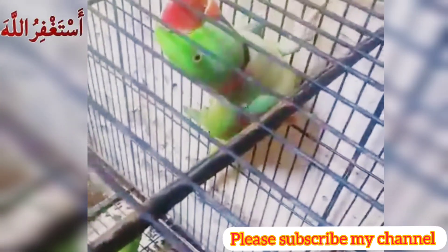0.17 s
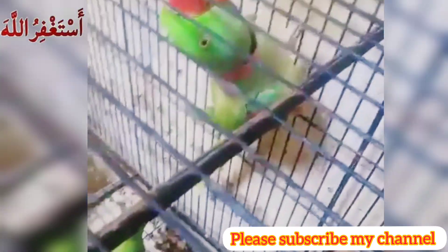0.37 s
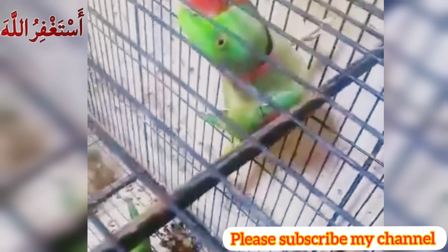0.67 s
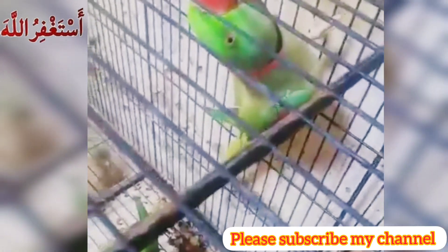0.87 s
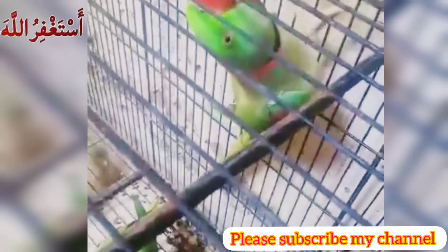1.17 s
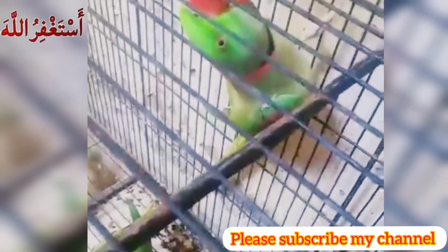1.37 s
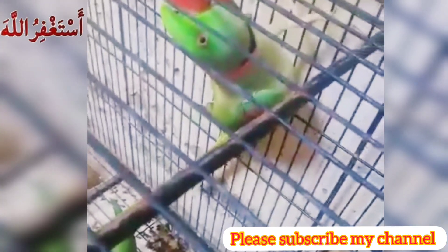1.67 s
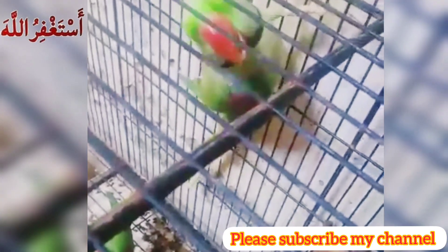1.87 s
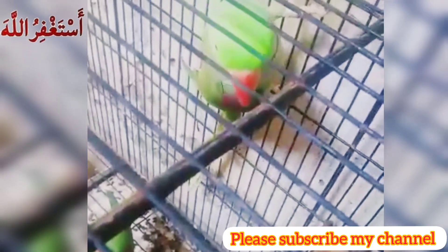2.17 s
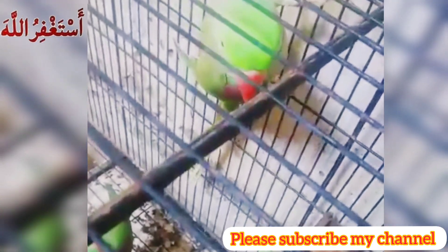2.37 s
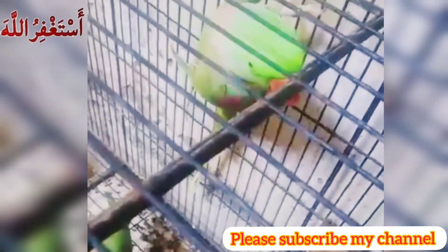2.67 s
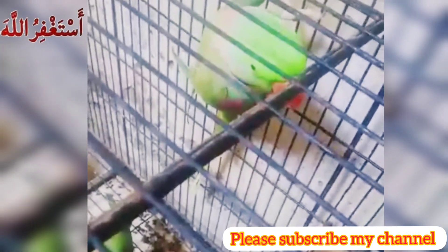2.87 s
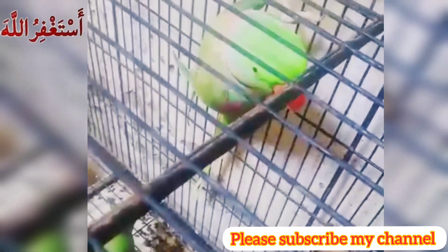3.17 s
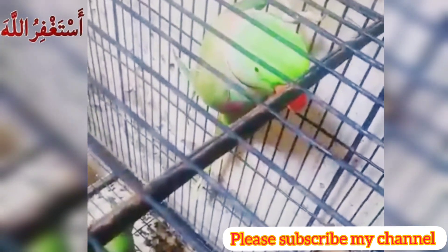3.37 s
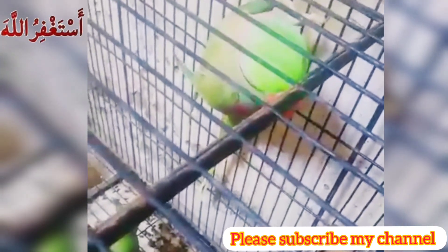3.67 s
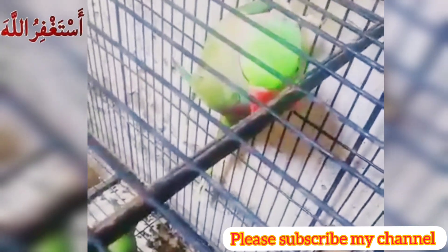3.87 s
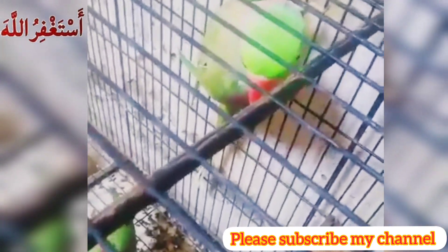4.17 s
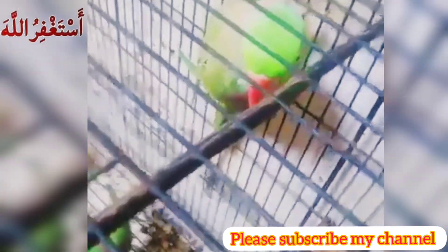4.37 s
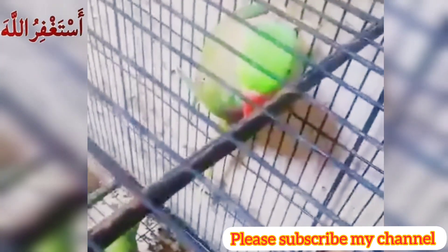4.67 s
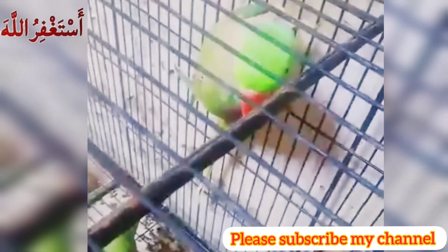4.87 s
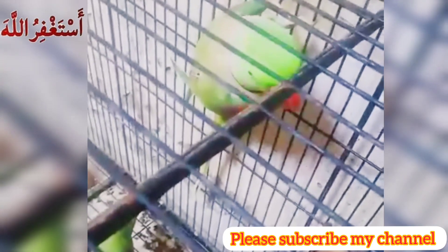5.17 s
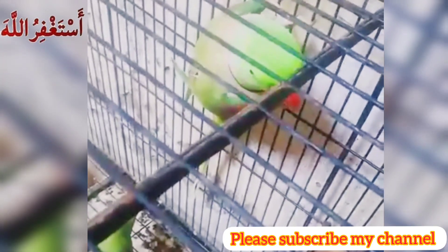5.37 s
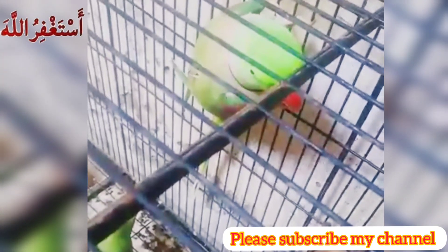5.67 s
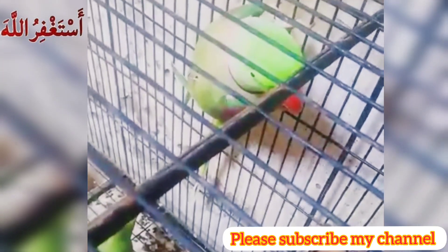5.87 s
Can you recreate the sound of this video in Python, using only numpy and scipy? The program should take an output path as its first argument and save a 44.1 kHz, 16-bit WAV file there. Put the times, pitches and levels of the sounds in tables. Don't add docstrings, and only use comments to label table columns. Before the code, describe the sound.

A caged parakeet very close to a phone microphone in a hard, echoing room. Feathers rustle and far small birds chirp hoarsely; a distant fowl caws twice, overlapped by one falling whistle. A cut-off yap and a loud buzzy squawk follow, then quiet. Later come three quick arched whistles with a strong wing brush, and a second yap and squawk. Low machine hum and faint hiss continue beneath.

```python
import sys
import numpy as np
from scipy import signal
from scipy.fft import rfft, irfft, next_fast_len
from scipy.io import wavfile
from scipy.ndimage import uniform_filter1d, minimum_filter1d, map_coordinates

SR = 44100
rng = np.random.default_rng(int(sys.argv[2]) if len(sys.argv) > 2 else 0)


def invert_db(level):
    return 10 ** (np.asarray(level, dtype=float) / 20)


def to_wav(sig):
    pcm = np.clip(np.atleast_2d(sig), -1, 1) * 32767
    pcm = np.round(pcm).astype(np.int16)
    wavfile.write(sys.argv[1], SR, pcm.T)


N = 265878
T = np.arange(N) / SR
TOP_HZ = 13500


def unit(x):
    return x / np.sqrt(np.mean(x ** 2) + 1e-20)


def along(points, hz):
    f, v = np.transpose(points)
    return np.interp(np.log(hz + 1), np.log(f + 1), v)


def step(x, width):
    return 0.5 + 0.5 * np.tanh(x / (2 * width))


def wobble(rate, size=N):
    knots = rng.standard_normal(int(size * rate / SR) + 4)
    return map_coordinates(knots, [np.arange(size) * rate / SR])


def phase_of(hz):
    return 2 * np.pi * np.cumsum(hz) / SR


def filtered(x, response):
    m = next_fast_len(x.shape[-1] + 8192)
    return irfft(rfft(x, m) * response(np.fft.rfftfreq(m, 1 / SR)), m)[..., :x.shape[-1]]


def resonances(modes):
    def response(f):
        total = 0
        for k, (centre, width, db) in enumerate(modes):
            damping = 1j * f * width
            total = total + (-1) ** k * invert_db(db) * damping / (centre * centre - f * f + damping)
        return total
    return response


def held(start, length, edge):
    span = slice(round(start * SR), round((start + length) * SR))
    t = T[span] - start
    return span, t, np.clip(np.minimum(t, length - t) / edge, 0, 1)


def note(rows, smooth, edge):
    s, *cols = np.transpose(rows)
    span, t, gate = held(s[0], s[-1] - s[0], edge)
    curves = [uniform_filter1d(np.interp(T[span], s, c), int(smooth * SR), mode="nearest") for c in cols]
    return span, gate, curves


def add_at(out, start, sound):
    out[:, round(start * SR):][:, :sound.shape[-1]] += sound


def buzz(hz, rough, jitter, breath):
    size = len(hz)
    phase = phase_of(hz * (1 + jitter * rough * wobble(500, size)))
    k = np.arange(1, 40)[:, None]
    pulses = unit((np.cos(k * phase) * (k * hz < TOP_HZ)).sum(0))
    gated = unit(rng.standard_normal(size) * (1 + np.cos(phase)))
    return pulses * invert_db(3.66 * rough * wobble(400, size)) + breath * rough * gated


# (f/Hz, t60/s)
ROOM_DECAY = [(400, 1.2), (1500, 0.89), (3000, 0.78), (6000, 0.62), (12000, 0.36)]


def room(x, delay):
    hz, t, z = signal.stft(rng.standard_normal((2, SR)), SR, nperseg=256)
    decay = invert_db(-60 * t / along(ROOM_DECAY, hz)[:, None])
    tail = signal.istft(z * decay, SR, nperseg=256)[1]
    tail = tail * (1 - np.exp(-np.arange(tail.shape[1]) / SR / delay))
    return signal.fftconvolve(x[None], tail / np.linalg.norm(tail[0]), axes=1)[:, :N]


def stereo_noise(spectrum, alike):
    def mid_side(hz):
        turn = np.arccos(np.clip(along(alike, hz), -1, 1)) / 2
        return invert_db(along(spectrum, hz)) * [np.cos(turn), np.sin(turn)]
    mid, side = filtered(rng.standard_normal((2, N)), mid_side)
    return unit(np.array([mid + side, mid - side]))


# (f/Hz, density/dB per Hz)
HUM_COLOUR = [(12, -39.5), (20, -8.5), (81, -4), (156, -15), (173, -17.5), (196, -13.5), (242, -17),
              (258, -27.5), (285, -13), (315, -42), (400, -34.5), (520, -66), (880, -120)]
# (f/Hz, level/dB)
HUM_LINES = [(49, -69), (73, -58), (97, -60.5), (148, -68)]
# (f/Hz, density/dB per Hz)
HISS_COLOUR = [(150, -33.5), (250, -12.5), (448, -12.5), (615, -18), (1010, -19.5), (2490, -26),
               (3370, -22), (11000, -33.5), (13400, -42)]
# (f/Hz, likeness -1 to 1)
PORT_LIKENESS = [(90, 0.993), (170, .9), (330, .1), (700, -0.3), (1510, -0.4), (4430, 0.01), (13000, -0.3)]
# (f/Hz, level/dB, lasts/s)
EARLIER_RING = [
    (5900, -53, .1),
    (11800, -60, 0.09),
]


def background(bird):
    hum = invert_db(-1 + 1.2 * wobble(5.9)) * stereo_noise(HUM_COLOUR, PORT_LIKENESS)
    for hz, db in HUM_LINES:
        level = invert_db(db + 56.5 + 3.6 * wobble(3.3))
        hum = hum + level * np.sin(phase_of(hz * (1 + 0.0455 * wobble(20.0))))
    call_power = np.abs(uniform_filter1d((bird ** 2).mean(0), int(0.048 * SR)))
    call_db = 10 * np.log10(call_power + 1e-12)
    duck_db = 5.5 * step(call_db + 26.5, 4.5)
    low = invert_db(-55 - 0.33 * T - duck_db) * hum
    hiss = invert_db(-60.5 + 0.45 * wobble(0.91)) * stereo_noise(HISS_COLOUR, PORT_LIKENESS)
    ring = 0
    for hz, db, lasts in EARLIER_RING:
        level = invert_db(db + 3.5 * np.array([wobble(40), wobble(40)]))
        tone = np.sin(2 * np.pi * hz * T + 1.2 * wobble(150))
        ring = ring + level * tone * np.clip((lasts - T) / 0.044, 0, 1)
    return low + hiss + ring


# (t/s, peak level/dB, lower partial/dB re peak, pitch factor)
CHIRPS = [(0.37, -27.5, 2, 0.99), (0.471, -32, -10, 0.94), (1.479, -29.5, -0.5, 0.99),
          (1.569, -27, 1.5, 0.96), (1.662, -25.5, -2.5, 1), (1.779, -25, -2.5, 0.99),
          (2.505, -28.5, -5, 1.06), (3.746, -30, 4, 1.01), (3.84, -25, -1.5, 0.99),
          (4.943, -28.5, 1.5, 0.99), (5.038, -28.5, 3, 0.95)]
# (t/s, f/Hz, level/dB)
CHIRP_ARCH = [
    (0, 1880, -15),
    (.022, 2070, -1),
    (.036, 1860, -6),
    (.055, 1660, -17),
]


def chirps():
    out = np.zeros(N)
    mouth = resonances([(1780, 470, -7.5), (3780, 1500, -3.0), (7240, 2800, -11.5)])
    for start, db, low_db, factor in CHIRPS:
        rows = np.array(CHIRP_ARCH) + [start, 0, 0]
        span, gate, (hz, swell_db) = note(rows, smooth=0.0019, edge=0.001)
        size = len(hz)
        phase = phase_of(factor * hz * (1 + 0.025 * wobble(500, size)))
        partials_db = (low_db, 0, -12, -13, -22)
        tone = sum(invert_db(g) * np.sin(k * phase) for k, g in enumerate(partials_db, start=1))
        breath = unit(filtered(rng.standard_normal(size), mouth))
        voice = invert_db(2.6 * wobble(200, size)) * tone + invert_db(-2.0) * breath
        out[span] += gate * invert_db(db - 3.5 + swell_db) * voice
    direct = np.array([out, 1.5 * np.roll(out, SR // 3600)])
    return invert_db(-5.5) * direct + invert_db(-8) * room(out, delay=0.005)


# (t/s, length/s, pulse rate f/Hz, level/dB, clear tone level/dB)
CAWS = [
    (1.624, 0.23, 508.3, -40.5, -15.5),
    (2.0, .55, 665.7, -38, 0.5),
]
# (f/Hz, width/Hz, level/dB)
CAW_THROAT = [(696, 79, -7.5), (1053, 110, 0), (1687, 616, -2), (2120, 250, -2), (2990, 560, -15.5)]


def fowl():
    out = np.zeros(N)
    for start, length, pitch_hz, db, clear_db in CAWS:
        span, t, gate = held(start, length, edge=0.02)
        size = len(t)
        hz = pitch_hz * (1 + 0.1 * t / length + 0.035 * wobble(14, size))
        swell_db = db - 9 * (t / length / 0.72 - 1) ** 2
        hoarse = unit(filtered(buzz(hz, 0.72, jitter=0.1, breath=3.2), resonances(CAW_THROAT)))
        clear = np.sin(phase_of(hz * (1 + 0.018 * wobble(40, size))))
        clear = invert_db(clear_db + 2.8 * wobble(60, size)) * clear
        out[span] = gate * invert_db(swell_db) * (hoarse + clear)
    direct = np.array([out, np.roll(out, SR // 1500)])
    return invert_db(-1.5) * direct + invert_db(1) * room(out, delay=0.0017)


# (t/s, peak level/dB, fall t60/s, tilt/dB per octave)
RUSTLES = [(0.0, -38.5, 0.053, -2), (0.109, -37, 0.18, 0.5), (0.152, -27, 0.069, 2.5),
           (0.459, -27.5, 0.14, 1), (0.6848, -38.5, 0.044, -8), (0.9937, -34.5, 0.24, -0.5),
           (1.1442, -37.5, 0.11, 2.7), (1.324, -32, 0.18, 6), (1.47, -35, 0.12, -1.5),
           (2.43, -38.5, 0.18, 1.5), (3.7447, -45, 0.25, -2.5), (4.204, -18.5, 0.33, 2.5),
           (4.6, -40.5, 0.16, -1), (4.9458, -45, 0.15, -4.5), (5.0849, -37.5, 0.16, -1),
           (5.5598, -39.5, 0.19, -3.7)]
# (f/Hz, density/dB per Hz)
FEATHER_COLOUR = [(350, -27.5), (600, -13.5), (1840, -6), (2170, -9.5), (2480, -7), (4870, -5), (5270, -10),
                  (8860, -6), (10800, -13), (12400, -1.5), (13400, -27)]


def rustles():
    out, t = np.zeros((2, N + SR)), np.arange(SR // 2) / SR
    size = len(t)
    for start, db, t60, tilt_db in RUSTLES:
        grain_db = 1.1 * wobble(45, size) + 1.9 * wobble(180, size)
        grains = rng.standard_normal((2, size)) * invert_db(grain_db)
        uneven_db = rng.normal(0, 3, size=14)

        def colour(hz):
            tilt = tilt_db * np.log2(np.maximum(hz, 500) / 6000)
            return invert_db(along(FEATHER_COLOUR, hz) + tilt + np.interp(hz, np.arange(14) * 1000, uneven_db))

        rise = 1 - np.exp(-(t / (0.16 * t60)) ** 2)
        fall = invert_db(db - 60 * t / max(t60, 0.01))
        add_at(out, start, rise * fall * unit(filtered(grains, colour)))
    return invert_db(7.5) * out[:, :N] + invert_db(6.5) * room(out[0, :N], delay=0.003)


# (t/s, peak level/dB)
TICKS = [
    (0.1095, -36),
    (0.6858, -30),
    (1.4795, -40),
    (3.9026, -22.5),
    (5.0853, -31),
]
# level/dB, f/Hz, t60/s
PERCH_SHAKE = (-39.5, 130, 0.96)


def cage():
    out, t = np.zeros((2, N + SR)), np.arange(SR // 2) / SR
    for start, db in TICKS:
        crack = invert_db(db + 5.5 - 60 * t / 0.022) * rng.standard_normal((2, len(t)))
        add_at(out, start, filtered(crack, lambda f: (1j * f / (1300 + 1j * f)) ** 2))
    db, hz, t60 = PERCH_SHAKE
    wood = resonances([(hz, 120, 0), (330, 300, -4), (900, 700, -12)])
    shake = unit(filtered(rng.standard_normal(len(t)), wood))
    add_at(out, 4.222, invert_db(db - 60 * t / t60) * (1 - np.exp(-t / 0.027)) * shake)
    return out[:, :N] + invert_db(-4.5) * room(out[0, :N], delay=0.0022)


OVERTONES_DB = (-5.5, -18.5, -9.5, -12)
# (f/Hz, level/dB)
BEAK = [(4200, -20), (5000, -9), (5800, -2), (6600, -6), (7700, -23), (8800, -4), (10500, -28), (12200, -8)]


def syrinx(hz, bright_db):
    phase = phase_of(hz * (1 + 0.001 * wobble(120, len(hz))))
    upper = 0
    for k, db in enumerate(OVERTONES_DB, start=2):
        upper = upper + invert_db(db + along(BEAK, k * hz)) * np.sin(k * phase) * (k * hz < TOP_HZ)
    return np.sin(phase) + invert_db(bright_db) * upper


# (t/s, f/Hz, level/dB)
GLIDE = [
    (1.862, 2550, -30.5),
    (1.87, 2541, -32),
    (1.946, 2497, -16.5),
    (1.994, 2340, -21.5),
    (2.046, 1944, -25),
    (2.056, 1940, -32.5),
]
# (t/s, rise/s, fall/s, top f/Hz, overtone level/dB)
WHISTLES = [
    (3.901, 0.041, 0.088, 3063, 5),
    (4.084, 0.071, .074, 3017, -1),
    (4.287, .068, .085, 2860, 0),
]


def whistles():
    out = np.zeros(N)
    span, gate, (hz, db) = note(GLIDE, smooth=0.03, edge=0.002)
    out[span] = gate * invert_db(db + 9) * syrinx(hz, bright_db=-7)
    for start, rise, fall, top_hz, bright_db in WHISTLES:
        span, t, gate = held(start, rise + fall, edge=0.004)
        rise_sag = 0.9 * np.abs(1 - t / rise) ** 2.3
        fall_sag = np.abs((t - rise) / fall) ** 1.95
        sag = np.where(t < rise, rise_sag, fall_sag)
        hz = top_hz * (1 - 0.21 * sag)
        dulling_db = 40.5 * t + 7 * sag * (t > rise)
        out[span] = gate * invert_db(-19.5 + 10) * syrinx(hz, bright_db - dulling_db)
    return out


# (t/s, hold/s, top pulse rate f/Hz, level/dB, roughness 0-1)
YAPS = [
    (2.553, .068, 576.2, -12, 0.1),
    (5.134, .068, 609.9, -11, .14),
]
# (t/s, hold/s, top pulse rate f/Hz, level/dB, roughness 0-1)
SQUAWKS = [
    (2.712, .126, 796.7, -10.5, 0.2),
    (5.292, .128, 809.6, -10.5, 0.049),
]
# (f/Hz, width/Hz, level/dB)
THROAT = [(367, 100, -6), (1597, 680, 3), (2240, 700, 7), (3944, 4160, 1), (6040, 900, 8),
          (8590, 960, -7.5), (11500, 9600, -19.5)]
# f/Hz, width/Hz, level/dB
WEAK_BAND = (3200, 330, -7)


def throat(f):
    centre, width, depth_db = WEAK_BAND
    notch = invert_db(depth_db * np.exp(-((f - centre) / width) ** 2))
    return resonances(THROAT)(f) * notch / (1 + (f / 11800) ** 12)


def squawks():
    out = np.zeros(N)
    slack_hz = 351.3
    calls = [(*row, 0.032, 0.009, False) for row in YAPS]
    calls += [(*row, 0.016, 0.0644, True) for row in SQUAWKS]
    for start, hold, top_hz, db, rough, rise, tail, arched in calls:
        span, t, gate = held(start, hold + tail, edge=0.0097)
        climb = step(t - rise, 0.009)
        drop = step(hold + 0.021 - t, 0.0087)
        arch = 1 - arched * 0.12 * (t / hold - 0.7) ** 2
        tension = climb * drop * arch
        hz = slack_hz + (top_hz - slack_hz) * tension
        attack_db = -19 * np.exp(-t / 0.02)
        fade_db = -135 * np.clip(t - hold + 0.022 * arched, 0, None)
        slack_db = 20 * np.log10(hz / top_hz)
        rough = np.clip(rough + 0.42 * (1 - tension), 0, 1)
        voice = unit(filtered(buzz(hz, rough, jitter=0.03, breath=1.3), throat))
        out[span] = gate * invert_db(db + attack_db + fade_db + slack_db) * voice
    return out


# (f/Hz, level/dB)
LEFT_PORT = [(500, 8.5), (1600, -4), (2700, 7.5), (4500, 3), (6300, 9), (9000, 15), (11200, -22.5),
             (12200, -18)]
# (f/Hz, level/dB)
RIGHT_PORT = [(500, -3.5), (1600, -3), (2700, -13.5), (4500, 7.5), (5600, 8.5), (8200, -6), (11200, 10.5),
              (12200, 0)]
# (t/s, left level/dB, right level/dB)
WALLS = [(.0021, -15, -17), (.0047, -18, -15), (.0083, -17, -19), (.0131, -20, -18), (.0194, -21, -21)]


def near(voice, facing):
    lead = 7.5 / SR

    def response(hz):
        colour = invert_db(facing * np.array([along(LEFT_PORT, hz), along(RIGHT_PORT, hz)]))
        ports = colour * np.exp(np.outer([1, -1], 1j * np.pi * hz * lead))
        walls = 0
        for delay, left_db, right_db in WALLS:
            delays = delay * np.array([[1], [1.07]])
            walls = walls + invert_db([[left_db], [right_db]]) * np.exp(-2j * np.pi * hz * delays)
        return ports * (1 + walls)

    return filtered(voice, response)


def parakeet():
    whistle, squawk = whistles(), squawks()
    direct = near(whistle, facing=0.95) + near(squawk, facing=0.25)
    return direct + invert_db(-12.5) * room(whistle + squawk, delay=0.04)


def scene():
    bird = parakeet()
    return background(bird) + chirps() + fowl() + rustles() + cage() + bird


def limited(x, top):
    need = np.minimum(1, top / (np.abs(x).max(0) + 1e-9))
    return x * uniform_filter1d(minimum_filter1d(need, size=441), size=221)


def starved(x, depth_db, scatter_db):
    frame, bins = 2048, 12
    hz, t, z = signal.stft(x, SR, nperseg=frame)
    edges = np.arange(0, len(hz), bins)
    band = np.add.reduceat(np.abs(z) ** 2, edges, axis=1).mean(0)
    around = np.abs(uniform_filter1d(band, size=11, axis=0)) + 1e-20
    luck = unit(uniform_filter1d(rng.standard_normal(band.shape), size=3, axis=1))
    margin_db = 10 * np.log10(np.clip(band / around, 3e-2, 11)) + depth_db + scatter_db * luck
    muting = invert_db(-26 / (1 + np.exp(np.clip(margin_db, -30, 30))))
    keep = np.where(hz[edges, None] > 2100, muting, 1)
    keep = np.repeat(keep, bins, axis=0)[:len(hz)]
    return signal.istft(z * keep, SR, nperseg=frame)[1][:, :N]


def roll_off(x):
    return signal.sosfilt(signal.butter(12, 13580, fs=SR, output="sos"), x)


def record(dry):
    def ports(hz):
        left_db = -10 * np.clip((hz - 11000) / 1500, 0, 1)
        return invert_db([left_db, 0 * hz]) * (hz < TOP_HZ)
    level = limited(filtered(dry, ports), top=0.84)
    mix = starved(level, depth_db=10, scatter_db=6.5)
    return roll_off(mix)


dry = scene()
out = record(dry)
to_wav(out)
```